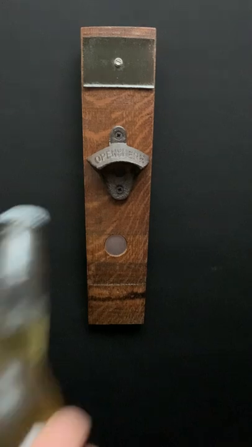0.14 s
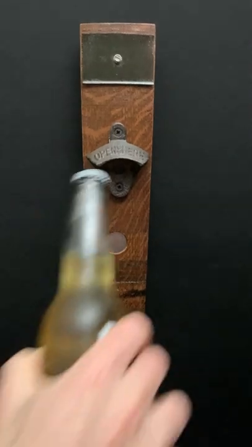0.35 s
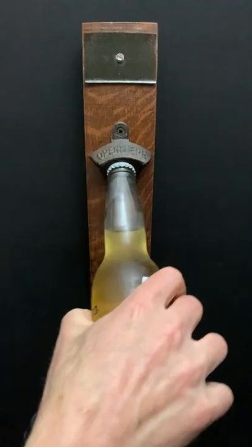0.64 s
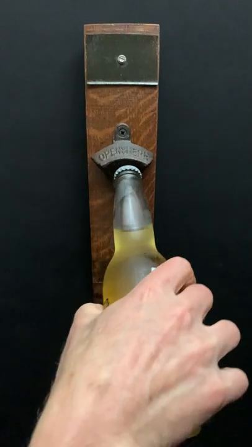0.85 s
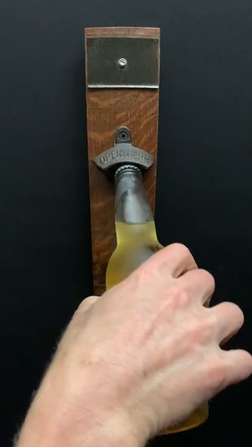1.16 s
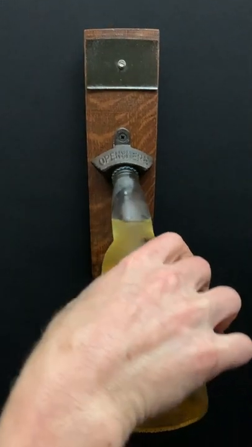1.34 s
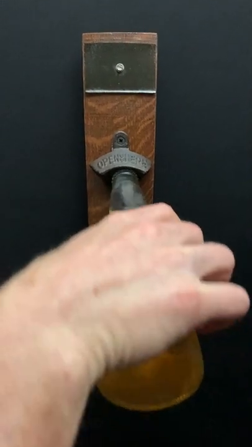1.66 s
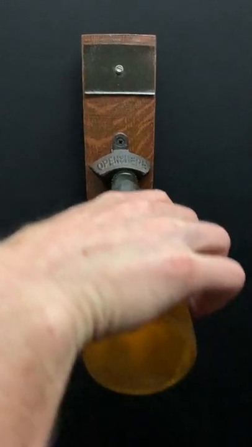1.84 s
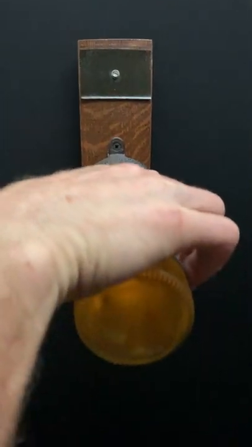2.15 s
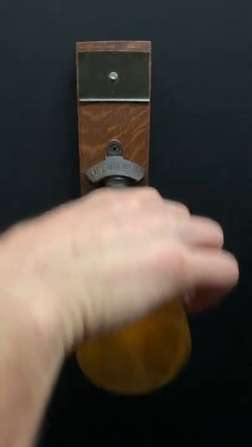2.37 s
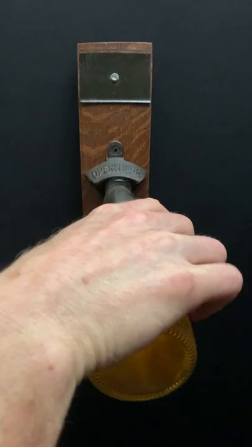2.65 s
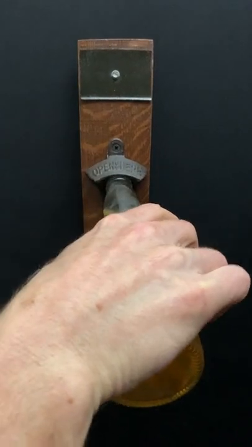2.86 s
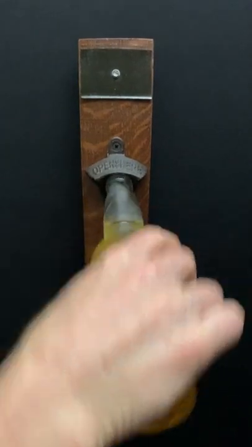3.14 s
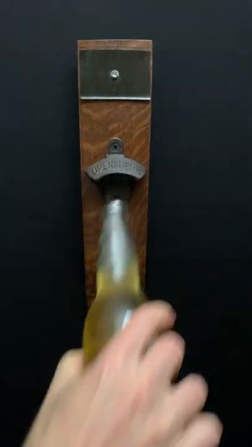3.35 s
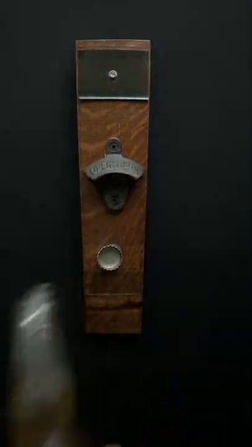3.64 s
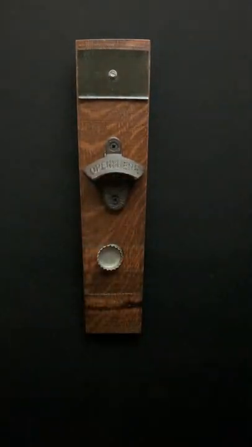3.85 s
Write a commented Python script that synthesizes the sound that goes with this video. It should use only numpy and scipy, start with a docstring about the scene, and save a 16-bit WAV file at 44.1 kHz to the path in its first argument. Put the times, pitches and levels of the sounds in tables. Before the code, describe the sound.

A glass bottle is opened on a metal opener: taps, a brief hiss, a cap clack.

```python
"""A glass bottle taps a cast-iron opener on a wooden board, over a refrigerator's hum in a small room.
The crown cap bites and creaks as its teeth bend, the lever's load thumps the board, and gas hisses out
as the seal opens. The cap squeaks off the glass rim and clatters onto a magnet.
A camera's limiter ducks everything at the loudest sounds, so the hum sinks and comes back after them."""
import sys
import numpy as np
from scipy import signal
from scipy.fft import rfft, irfft, next_fast_len
from scipy.io import wavfile
from scipy.ndimage import uniform_filter1d, map_coordinates

SR = 44100
rng = np.random.default_rng(int(sys.argv[2]) if len(sys.argv) > 2 else 0)


def transcribe(u):
    """Save the signal u as a 16-bit wav file named by the first command-line argument.

    u: samples, shape (n,) or (channels, n), limited to [-1, 1]; the rate is SR.
    q: integer samples, one column per channel.
    """
    v = np.clip(np.atleast_2d(u).T, -1, 1)
    q = np.round(v * 32767).astype(np.int16)
    wavfile.write(sys.argv[1], SR, q)


N = 176400
T = np.arange(N) / SR
AGE = T[:SR // 2]  # seconds since a hit


def amp(db):
    """Decibels to gain."""
    return 10 ** (np.asarray(db) / 20)


def unit(x):
    """Scale to rms 1."""
    return x / np.sqrt(np.mean(x ** 2) + 1e-20)


def along(points, hz):
    """Read a curve of (Hz, value) points on a log frequency axis."""
    freqs, values = np.transpose(points)
    return np.interp(np.log(hz + 1), np.log(freqs + 1), values)


def filtered(x, response):
    """Filter x by a response given as a function of Hz."""
    size = next_fast_len(N + SR // 2)
    return irfft(rfft(x, size) * response(np.fft.rfftfreq(size, 1 / SR)), size)[..., :N]


def noise(colour):
    """Coloured noise of rms 1."""
    return unit(filtered(rng.standard_normal(N), lambda hz: amp(along(colour, hz))))


def wobble(rate):
    """A smooth random curve with `rate` knots a second."""
    return map_coordinates(rng.standard_normal(int(N * rate / SR) + 4), [T * rate])


def add(track, start, sound):
    """Mix a sound in at `start` seconds."""
    part = track[round(start * SR):][:len(sound)]
    part += sound[:len(part)]


def crack(colour, t60, tilt_db=0):
    """A contact: a noise burst that falls 60 dB in t60 seconds, tilted per octave around 8 kHz."""
    hz = np.fft.rfftfreq(len(AGE), 1 / SR)
    eq = amp(along(colour, hz) + tilt_db * np.log2((hz + 100) / 8000))
    burst = unit(irfft(rfft(rng.standard_normal(len(AGE))) * eq, len(AGE)))
    return burst * amp(-60 * AGE / t60) / 2


def ring(modes, scatter_db):
    """Damped modes, struck a little differently each time."""
    out = np.zeros(len(AGE))
    for hz, db, t60 in modes:
        envelope = amp(db + scatter_db * rng.normal() - 60 * AGE / t60)
        pitch = hz * (1 + 0.0045 * rng.normal())
        out += envelope * np.sin(2 * np.pi * pitch * AGE)
    return out


# The bottle's knocks on the opener. Each row: start in seconds, level in dB, treble tilt in dB per
# octave, ring pitch in Hz, ring level in dB relative to the knock, ring t60 in seconds.
BOTTLE_TAPS = [(1.007, -25, -6.5, 1457, -4.5, 0.057), (1.019, -26, -10.5, 1420, -6, 0.065),
               (1.0414, -23.5, 1, 2950, -11, 0.047), (1.0544, -20, -1, 1444, -4.5, 0.13),
               (1.535, -28, 0.5, 1526, -16, 0.23), (2.001, -42, 0, 1500, -13, 0.034),
               (2.036, -28, -0.5, 1850, -8.5, 0.13), (2.361, -39, -18, 1200, 3.5, 0.013),
               (2.384, -47.5, 4.5, 1250, -17, 0.027), (2.4047, -34.5, 4, 1200, 5.5, .02),
               (2.417, -20.5, 4, 1258, 3, .022), (3.17, -28.5, -10.5, 944, -8.5, 0.038)]
# The opener's iron ring. Each row: pitch in Hz, level in dB, t60 in seconds.
IRON_MODES = [(757, -13.5, 0.085), (1096, -10.5, .07), (1766, 4, 0.067), (2075, -3, 0.051),
              (2833, -5.5, 0.15), (3210, -6, 0.067), (3780, -12, .09), (5100, -21, .06), (6100, -30.5, .05)]
# The mid-heavy attack of a knock. Each row: frequency in Hz, level in dB.
TAP_COLOUR = [(200, -21.5), (700, -11.5), (1050, -15.5), (1400, 6), (1900, 0.5), (2400, -17), (3000, -7.5),
              (3900, -27.5), (4500, -40.5), (6500, -27), (10500, -35.5), (13000, -55), (16000, -48.5)]


def bottle_taps():
    """The capped neck grinds and knocks on the iron; its ring depends on where and how hard it bears."""
    out = np.zeros(N)
    attack = 1 - np.exp(-AGE / 0.00021)
    for start, db, tilt_db, hz, ring_db, t60 in BOTTLE_TAPS:
        grit = amp(2.5 * wobble(900)[:len(AGE)])
        iron = amp(-15.5) * ring(IRON_MODES, scatter_db=1.5)
        main_ring = amp(ring_db - 60 * AGE / t60) * np.sin(2 * np.pi * hz * AGE)
        contact = grit * crack(TAP_COLOUR, t60=0.042, tilt_db=tilt_db)
        add(out, start, amp(db) * attack * (contact + iron + main_ring))
    return room(out, wet_db=-8)


# The crown bending. Each row: start in seconds, level in dB, treble tilt in dB per octave.
CROWN_TICKS = [(0.457, -56, 2), (1.69, -55, -4.5), (1.944, -58, -5.5), (2.4074, -35.5, 2),
               (2.4183, -11, 0.5), (3.092, -41, 5), (3.103, -26.5, 4.5), (3.175, -36.5, -1),
               (3.2116, -23.5, -2.5), (3.2175, -16.5, -2)]
# The crisp edge of a tick. Each row: frequency in Hz, level in dB.
TICK_COLOUR = [(300, -24.5), (1500, -5), (3200, -1.5), (5000, -13.5), (7400, -13), (9300, 4), (10800, -3.5),
               (12200, -20.5), (15500, -11.5)]


def crown_ticks():
    """The crown's teeth give way in sharp ticks."""
    out = np.zeros(N)
    for start, db, tilt_db in CROWN_TICKS:
        add(out, start, amp(db) * crack(TICK_COLOUR, t60=0.018, tilt_db=tilt_db))
    return room(out, wet_db=-8.5)


# The airy top of the escaping gas. Each row: frequency in Hz, level in dB.
GAS_COLOUR = [(200, -56), (1000, -37.5), (2200, -31), (3400, -17.5), (4800, -29.5), (5600, -34),
              (6500, -17), (7700, -11), (9200, -5), (11000, -7), (13200, -4), (14400, -4), (15800, -2)]


def gas_hiss():
    """The seal opens: one short swell of slightly sputtering hiss."""
    peak_s, rise_s, fall_s = 2.906, 0.019, 0.02
    width = np.where(T < peak_s, rise_s, fall_s)
    swell = np.exp(-((T - peak_s) / width) ** 2 / 2)
    sputter = amp(1.3 * wobble(500))
    return room(amp(-11) * swell * sputter * noise(GAS_COLOUR), wet_db=-12)


# The path of the cap's squeak. Each row: time in seconds, pitch in Hz, level in dB.
SQUEAK_PATH = [(3.279, 449, -63.5), (3.289, 447, -31.5), (3.302, 436, -37.5), (3.313, 505, -46),
               (3.327, 454.7, -30), (3.346, 440.8, -23.5), (3.356, 424.4, -23), (3.373, 417, -29),
               (3.385, 410, -60)]


def cap_squeak():
    """The cap slips off the rim with a low, wavering tone and its faint octave."""
    times, hz, db = np.transpose(SQUEAK_PATH)
    pitch = np.interp(T, times, hz) * (1 + 0.012 * wobble(150))
    phase = 2 * np.pi * np.cumsum(pitch) / SR
    envelope = amp(np.interp(T, times, db, left=-200, right=-200))
    return room(envelope * (np.sin(phase) + amp(-17.5) * np.sin(2 * phase)), wet_db=-4)


# The cap's strokes over the rim. Each row: peak time in seconds, width in seconds, level in dB.
RIM_SCRAPES = [(3.27, 0.017, -49.5), (3.353, .004, -30), (3.365, 0.0056, -7)]
# The bright rasp of metal on glass. Each row: frequency in Hz, level in dB.
SCRAPE_COLOUR = [(500, -29.5), (2300, -22.5), (2900, -8.5), (3400, -21.5), (4000, -5.5), (4450, -8.5),
                 (4950, 4.5), (5450, 12.5), (6300, -9.5), (8000, -20.5), (10000, -31.5), (16000, -26)]


def cap_scrape():
    """The cap drags over the glass rim in short swells of gritty noise."""
    swells = sum(amp(db) * np.exp(-((T - peak) / width) ** 2 / 2) for peak, width, db in RIM_SCRAPES)
    grit = amp(2.5 * wobble(700))
    return room(swells * grit * noise(SCRAPE_COLOUR), wet_db=-15)


# The loose cap's hits on the opener, then on the magnet.
# Each row: start in seconds, level in dB, ring level in dB relative to the hit.
CAP_CLACKS = [(3.2998, -30, -13.5), (3.3198, -32.5, -8.5), (3.328, -35, -14.5), (3.337, -45.5, -9),
              (3.3602, -10.5, -23.5), (3.366, 6, -26), (3.3663, 8, -18.5), (3.3704, 10, -25.5),
              (3.3734, 14.5, -28.5), (3.3768, 8, -22), (3.381, -8.5, -25)]
# The cap's tinny ring. Each row: pitch in Hz, level in dB, t60 in seconds.
CAP_MODES = [(1820, -8, .24), (1980, -2, .07), (2790, -10, .1), (3950, -7, .1), (4950, -3, .09),
             (5330, -2, .12), (6115, -11, .09), (8160, -2, .09), (9210, 0, .15), (11410, -11, .07),
             (13450, -7, .08), (14840, -1, .12)]
# The hard snap of a hit. Each row: frequency in Hz, level in dB.
CLACK_COLOUR = [(200, -14.5), (1100, -38), (1900, -5), (3200, -18.5), (4300, 1.5), (5500, 6.5), (7000, 1.5),
                (10000, 4), (12500, -13.5), (15000, 4), (16000, -16)]


def cap_clatter():
    """The loose cap ticks free, snaps onto the magnet and chatters to rest."""
    out = np.zeros(N)
    for start, db, ring_db in CAP_CLACKS:
        snap = crack(CLACK_COLOUR, t60=0.045)
        metal = amp(ring_db) * ring(CAP_MODES, scatter_db=0.5)
        add(out, start, amp(db) * (snap + metal))
    return room(out, wet_db=-13)


# Blows into the board. Each row: start in seconds, level in dB, tilt of the modes in dB per octave.
BOARD_THUMPS = [(1.057, -41.5, -17.5), (1.073, -34.5, -6.5), (1.545, -38, -5), (2.041, -46.5, -19),
                (2.424, -34, -14), (3.171, -25, 6), (3.183, -19, -4), (3.209, -27, 5)]
# The board's woody body. Each row: pitch in Hz, level in dB, t60 in seconds.
BOARD_MODES = [(108.65, 0, 0.095), (159.5, -0.5, 0.086), (248.8, -4, 0.095), (280, -2.5, 0.19),
               (385.8, 0.5, .1), (442, -7, 0.11)]
# The dull weight of a blow. Each row: frequency in Hz, level in dB.
THUD_COLOUR = [(40, -12.5), (110, 1), (160, 0.5), (210, -16.5), (290, 1.5), (420, -5), (620, -20.5),
               (900, -20.5), (1500, -42), (4000, -83)]


def board_thumps():
    """The lever's load knocks the board against the wall: a dull thud and the wood's modes."""
    out = np.zeros(N)
    attack = 1 - np.exp(-AGE / 0.003)
    for start, db, tilt_db in BOARD_THUMPS:
        modes = [(hz, level + tilt_db * np.log2(hz / 200), t60) for hz, level, t60 in BOARD_MODES]
        wood = ring(modes, scatter_db=2)
        thud = amp(-2.5) * crack(THUD_COLOUR, t60=0.22)
        add(out, start, amp(db) * attack * (wood + thud))
    return room(out, wet_db=-11.5)


# The compressor's drone. Each row: harmonic number, level in dB.
HUM_HARMONICS = [(1, -39.5), (2, -57.5), (3, -62.5), (4, -70.5), (5, -58.5)]


def fridge():
    """A compressor's steady hum and a thin whine that swells and fades, a little to the left."""
    hum_hz, whine_hz = 58.58, 1773
    phase = 2 * np.pi * np.cumsum(hum_hz * (1 + 0.0016 * wobble(3))) / SR
    hum = np.zeros(N)
    for harmonic, db in HUM_HARMONICS:
        drift_db = min(harmonic, 4) * 0.51 * wobble(5)
        hum += amp(db + drift_db) * np.sin(harmonic * phase + rng.uniform(0, 2 * np.pi))
    whine = amp(-72.5 + 4 * wobble(18)) * np.sin(phase * whine_hz / hum_hz)
    pan = amp([[1.1], [-1.1]])
    return np.sqrt(2) * (hum + whine) * pan


# The room's faint air. Each row: frequency in Hz, level in dB.
AIR_COLOUR = [(350, -37), (600, 3), (625, -7), (779, -8), (858, -16), (1140, -4.5), (1390, -22), (1800, 0),
              (1900, -8), (2370, -9.5), (2570, -24), (3430, -30), (3730, -25), (5120, -41.5), (7620, -31),
              (12300, -42), (16000, -41.5)]
# The room's low rumble. Each row: frequency in Hz, level in dB.
RUMBLE_COLOUR = [(20, -14), (45, 0.5), (70, 1), (92, 5), (130, -9.5), (220, -18), (300, -13.5), (400, -15),
                 (600, -33), (800, -59.5)]


def room_tone():
    """A steady bed of air and rumble from all around."""
    pair = [amp(-64) * noise(AIR_COLOUR) + amp(-48.5) * noise(RUMBLE_COLOUR) for _ in range(2)]
    return diffuse(np.array(pair))


# The small room's short tail. Each row: frequency in Hz, t60 in seconds.
ROOM_DECAY = [(150, 0.31), (1000, 0.2), (3000, 0.28), (6000, 0.25), (10000, 0.19), (16000, 0.1)]
# The direct sound's stereo image. Each row: frequency in Hz, lead of the left port in radians.
PORT_PHASE = [(100, 0), (600, 0.72), (1400, -1.1), (2100, 1.05), (2800, 0.2), (3700, 1.54), (4500, -2.1),
              (5500, -2), (7000, -0.84), (8400, -2.5), (10200, 1.34), (12200, 2.5), (14000, 4.5),
              (16000, 4.5)]


def room(x, wet_db):
    """The direct sound at both microphone ports plus the room's diffuse tail."""
    hz, age, spectrum = signal.stft(rng.standard_normal((2, SR // 2)), SR, nperseg=256)
    decay = amp(-60 * age / along(ROOM_DECAY, hz)[:, None])
    tail = signal.istft(spectrum * decay, SR, nperseg=256)[1]
    tail *= 1 - np.exp(-np.arange(tail.shape[1]) / SR / 0.0013)  # reflections build up
    wet = signal.fftconvolve(x[None], tail / np.linalg.norm(tail[0]), axes=1)[:, :N]
    direct = filtered(x, lambda f: np.exp(0.5j * along(PORT_PHASE, f) * np.array([[1], [-1]])))
    return direct + amp(wet_db) * diffuse(wet)


def diffuse(pair):
    """Two unrelated signals as a diffuse field: alike in the bass, unrelated in the treble."""
    def spread(hz):
        angle = np.pi / 4 * hz / np.hypot(hz, 700)
        return np.array([np.cos(angle), np.sin(angle)])
    mid, side = filtered(pair, spread)
    return np.array([mid + side, mid - side])


def scene():
    """All sources at the two microphone ports."""
    opening = bottle_taps() + crown_ticks() + board_thumps() + gas_hiss()
    return opening + cap_squeak() + cap_scrape() + cap_clatter() + fridge() + room_tone()


def limiter_gain(dry):
    """The gain drops as the rms level passes the ceiling, holds, then recovers slowly."""
    ceiling_db, hold_s, release_s = -11.5, 0.074, 0.17
    hop, memory = 64, 300  # samples a step, steps remembered
    power = uniform_filter1d(np.mean(dry ** 2, axis=0), size=180)
    level = np.sqrt(np.abs(power) + 1e-12)
    needed = np.minimum(1, amp(ceiling_db) / level)[::hop]
    since = np.arange(memory) * hop / SR
    recovered = np.clip((since - hold_s) / release_s, 0, 1) ** 2
    padded = np.pad(needed, (memory - 1, 0), constant_values=1)
    past = np.lib.stride_tricks.sliding_window_view(padded, memory)[:, ::-1]
    deepest_duck = np.min(past + (1 - past) * recovered, axis=1)
    return np.interp(T, T[::hop], deepest_duck)


def record(dry):
    """The camera's sound chain: quick fade-in, limiter, low cut, soft clip and a steep high cut."""
    start_s, low_cut_hz, peak_limit, high_cut_hz = 0.034, 42, 0.93, 15950
    fade_in = np.clip((T - start_s) / 0.002, 0, 1)
    low_cut = signal.butter(3, low_cut_hz, 'high', fs=SR, output='sos')
    sound = signal.sosfilt(low_cut, dry * limiter_gain(dry) * fade_in)
    rounded = sound / (1 + (sound / peak_limit) ** 6) ** (1 / 6)
    return filtered(rounded, lambda hz: 1 / (1 + (hz / high_cut_hz) ** 200))


dry = scene()
out = record(dry)
transcribe(out)
```